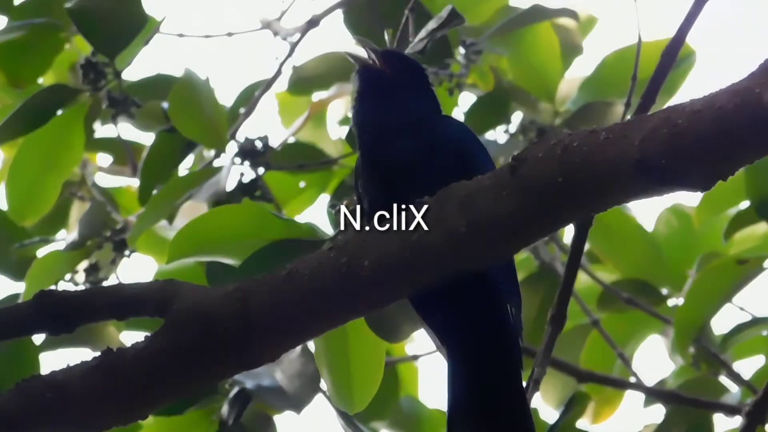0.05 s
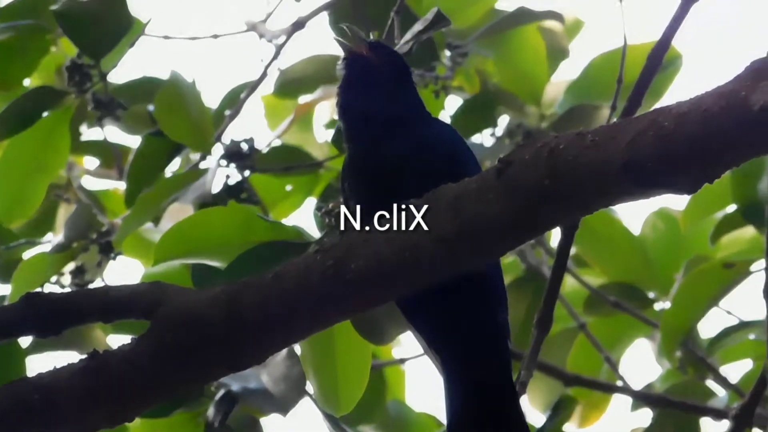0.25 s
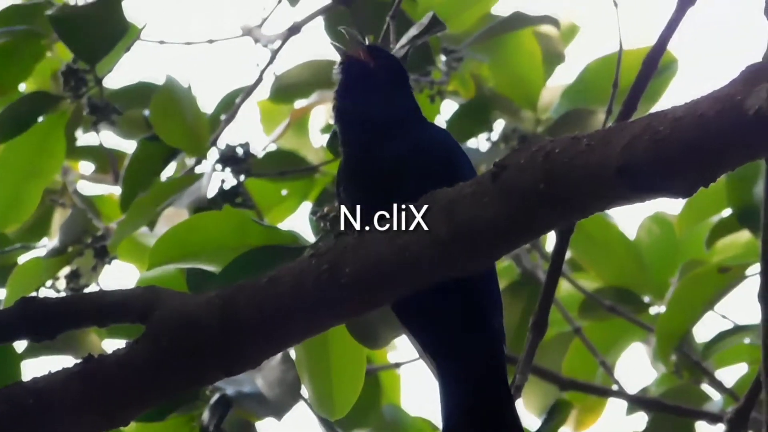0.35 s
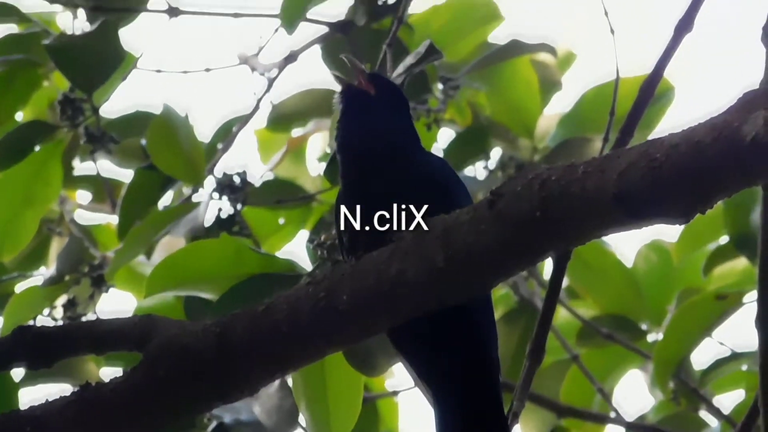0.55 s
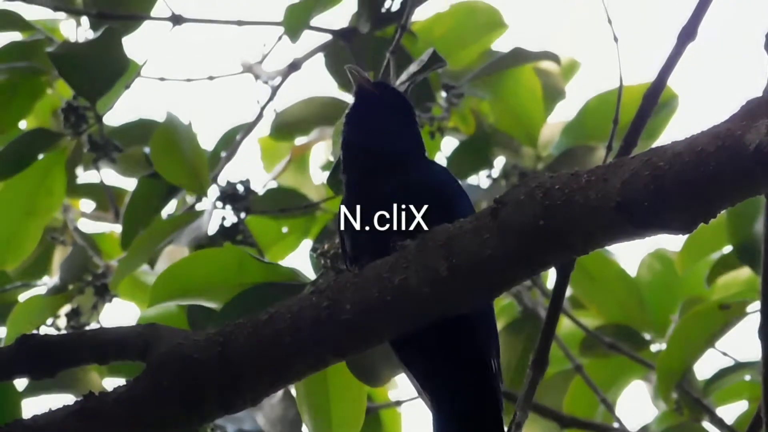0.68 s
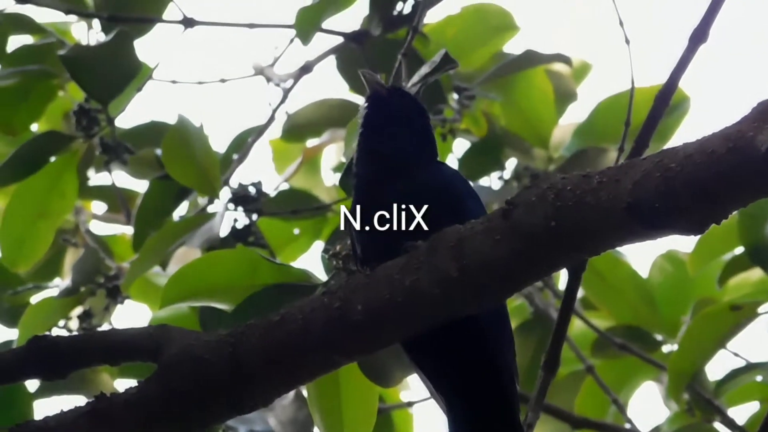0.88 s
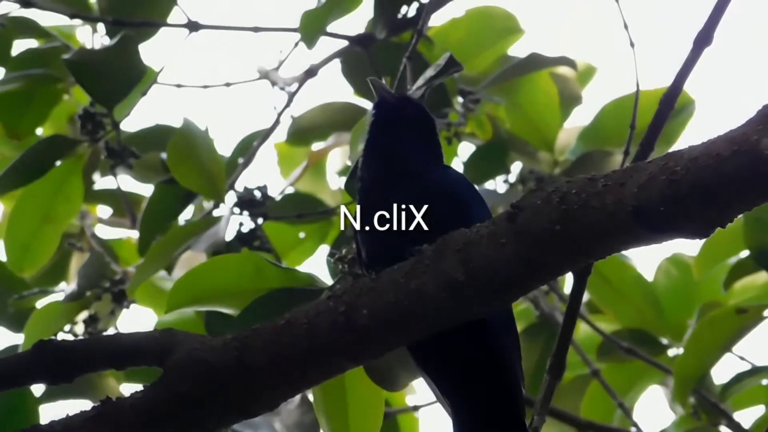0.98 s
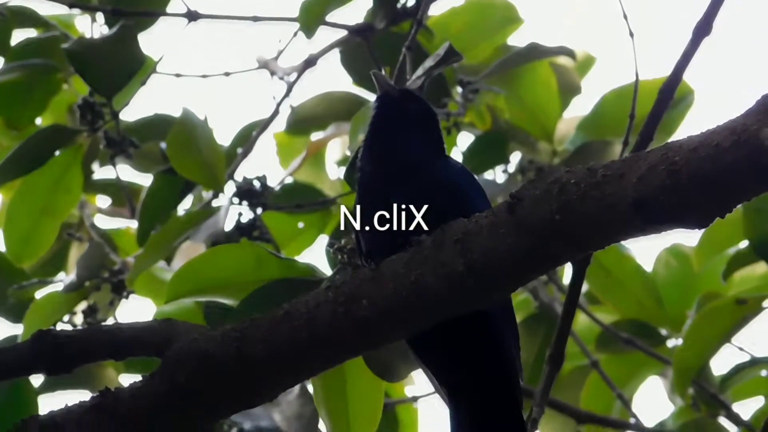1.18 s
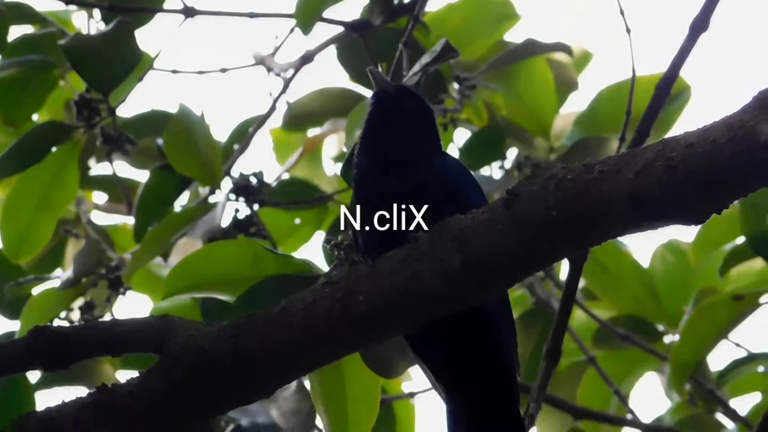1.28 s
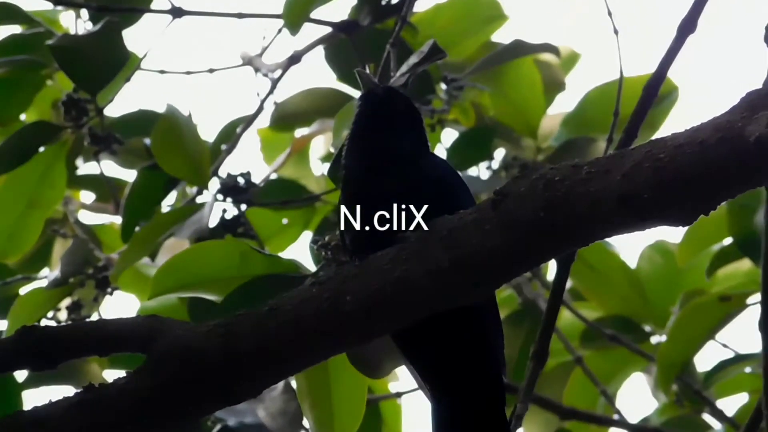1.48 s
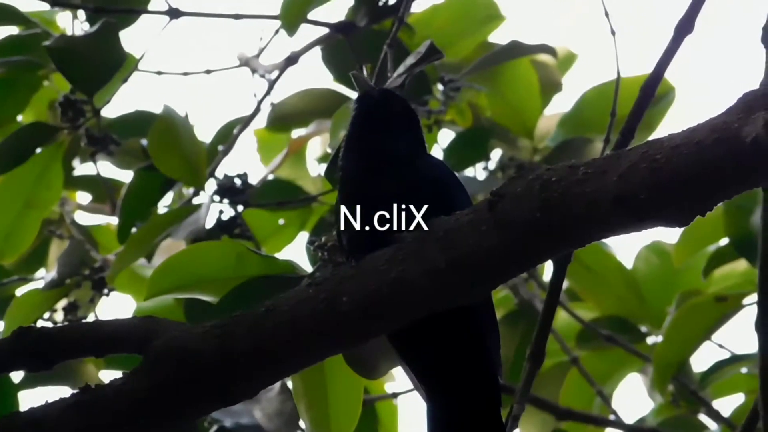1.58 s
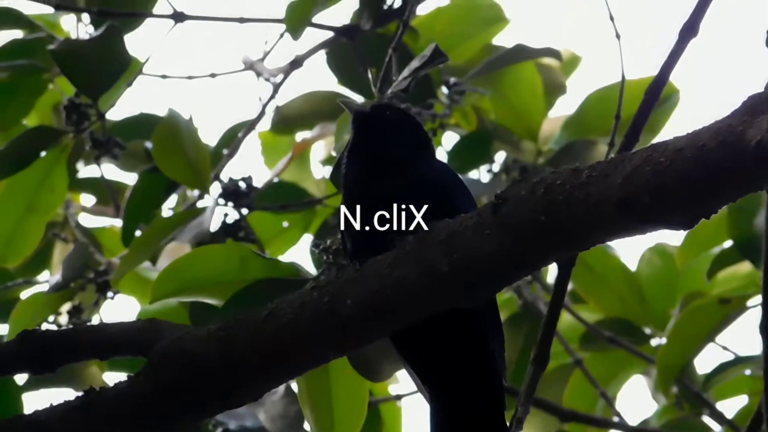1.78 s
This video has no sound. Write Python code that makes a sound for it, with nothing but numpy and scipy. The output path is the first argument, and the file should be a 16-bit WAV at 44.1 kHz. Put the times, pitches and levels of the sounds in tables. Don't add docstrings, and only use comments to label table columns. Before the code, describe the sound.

Single koel call early on, a breathy onset then a clear rising and falling whistle, heard outdoors from a small stereo microphone, followed by a short leafy reverberation, faint far pipings, hoarse crow chatter and low hum.

```python
import sys
import numpy as np
from scipy import signal
from scipy.fft import rfft, irfft, next_fast_len
from scipy.io import wavfile
from scipy.ndimage import uniform_filter1d, map_coordinates

SR = 44100
rng = np.random.default_rng(int(sys.argv[2]) if len(sys.argv) > 2 else 0)


def how_loud(loudness_db):
    steps = np.asarray(loudness_db, float) / 20
    return 10 ** steps


def store_wav(level_fs):
    pcm = np.round(np.clip(np.atleast_2d(level_fs), -1, 1) * 32767)
    wavfile.write(sys.argv[1], SR, pcm.T.astype(np.int16))


N = 81585
T = np.arange(N) / SR


def unit(x):
    return x / np.sqrt(np.mean(x ** 2) + 1e-20)


def along(points, hz):
    f, v = np.transpose(points)
    return np.interp(np.log(hz + 1), np.log(f + 1), v)


def smooth_curve(rows):
    s, v = np.transpose(rows)
    slope = np.gradient(v, s)
    k = np.clip(np.searchsorted(s, T) - 1, 0, len(s) - 2)
    h = s[k + 1] - s[k]
    u = np.clip((T - s[k]) / h, 0, 1)
    step = (v[k + 1] - v[k]) * u * u * (1 + 2 * (1 - u))
    bend = h * u * (1 - u) * ((1 - u) * slope[k] - u * slope[k + 1])
    return v[k] + step + bend


def wobble(rate):
    return map_coordinates(rng.standard_normal(200), [T * rate])


def filtered(x, response):
    m = next_fast_len(N + SR)
    return irfft(rfft(x, m) * response(np.fft.rfftfreq(m, 1 / SR)), m)[..., :N]


def coloured(x, colour):
    return filtered(x, lambda hz: how_loud(along(colour, hz)))


def placed(x, pan, lag_s):
    side = np.array([[.5], [-.5]])
    return filtered(x, lambda hz: how_loud(side * along(pan, hz)) * np.exp(-2j * np.pi * hz * side * lag_s))


def rush(spectrum, alike, patchy_db, wide, long):
    z = signal.stft(rng.standard_normal((2, N)), nperseg=512)[2]
    field = uniform_filter1d(rng.standard_normal(z.shape[1:]), wide, 0)
    field = uniform_filter1d(field, long, 1)
    pair = signal.istft(z * how_loud(patchy_db * unit(field)), nperseg=512)[1][:, :N]

    def mid_side(hz):
        turn = np.arccos(np.clip(along(alike, hz), -1, 1)) / 2
        return how_loud(along(spectrum, hz)) * [np.cos(turn), np.sin(turn)]

    mid, side = filtered(pair, mid_side)
    return unit(np.array([mid + side, mid - side]))


# (f/Hz, correlation)
ALIKE = [(40, .93), (80, .88), (140, .64), (300, .55), (640, .62), (1400, .4), (3000, 0), (15000, 0)]
# (f/Hz, level/dB per Hz)
TOWN = [(13, -38), (22, 1), (76, -0.5), (215, -8), (837, -4.5), (915, -3.5), (1170, -9), (1500, -9.5),
        (1950, -11), (3300, -120)]


def town():
    return how_loud(-55 + .4 * wobble(1)) * rush(TOWN, ALIKE, patchy_db=1.25, wide=6, long=14)


# (f/Hz, level/dB per Hz)
LEAVES = [(710, -33.5), (1200, -6), (1720, -11.5), (2020, -9.5), (6440, -24), (7240, -21), (15200, -28.5)]


def leaves():
    return how_loud(-56 + .13 * wobble(1.4)) * rush(LEAVES, ALIKE, patchy_db=-1.66, wide=6, long=14)


# (f/Hz, level/dB)
INSECTS = [(6300, -34), (6750, -10), (7100, 3), (7500, 0.5), (7800, -33)]


def insects():
    band = [(20, -120)] + INSECTS + [(12000, -120)]
    chorus = rush(band, [(7000, .1)], patchy_db=-6.5, wide=5, long=3)
    return how_loud(-70.5 + 1.8 * wobble(70.07)) * chorus


# (f/Hz, left over right level/dB)
TOWN_PAN = [(100, -2), (2000, -2), (12000, -1.5)]


def background():
    bed = filtered(town() + leaves(), lambda hz: how_loud([[.5], [-.5]] * along(TOWN_PAN, hz)))
    return bed + insects()


# (f/Hz, t60/s)
GARDEN = [(500, .8), (1400, .95), (3000, .6), (5500, .33), (10000, .4)]


def garden(x):
    _, t, z = signal_frames = signal.stft(rng.standard_normal((2, SR)), SR, nperseg=256)
    hz = signal_frames[0]
    decay = how_loud(-60 * t / along(GARDEN, hz)[:, None])
    a, b = signal.istft(z * decay, SR, nperseg=256)[1]
    u = np.arccos(.4) / 2
    tail = np.array([np.cos(u) * a + np.sin(u) * b, np.cos(u) * a - np.sin(u) * b])
    tail = tail * (1 - np.exp(-np.arange(len(a)) / SR / .02))
    tail = tail * how_loud(4 * wobble(40)[:len(a)])
    return signal.fftconvolve(x, tail / np.linalg.norm(tail[0]), axes=1)[:, :N]


# (t/s, level/dB)
CHATTER = [(0, -59), (.14, -60.5), (.3, -57.5), (1.02, -57.5), (1.13, -53.5), (1.3, -51.5), (1.42, -62),
           (1.52, -59.5), (1.85, -67)]
# (f/Hz, level/dB)
CROW = [(600, -58), (780, -4.5), (1000, -5.5), (1200, -1), (1400, -17.5), (1800, -19)]


def far_crows():
    band = [(20, -120)] + CROW + [(4000, -120)]
    voices = rush(band, [(1000, .75)], patchy_db=5, wide=1, long=5)
    lumps = how_loud(np.interp(T, *np.transpose(CHATTER)) + 2.5 * wobble(25))
    return lumps * voices * how_loud([[-1.2], [1.2]])


def whistles(rows):
    out = np.zeros(N)
    for start, length, hz, end_hz, db in rows:
        u = np.clip((T - start) / length, 0, 1)
        turn = 2 * np.pi * np.cumsum(hz + (end_hz - hz) * u) / SR
        out += how_loud(db) * np.sin(np.pi * u) ** .45 * np.sin(turn)
    return out * how_loud(2.1 * wobble(44.83)) * np.sqrt(2)


# (t/s, length/s, start f/Hz, end f/Hz, level/dB)
AHEAD = [(0, .07, 3660, 3640, -68), (.42, .06, 1740, 1735, -63), (.43, .06, 2090, 2085, -66),
         (.895, .1, 872, 866, -58), (.9, .07, 3700, 3650, -67), (1.205, .04, 1920, 1915, -62),
         (1.772, .028, 1250, 950, -53), (1.44, .08, 510, 500, -59), (.86, .06, 520, 500, -60),
         (1.8, .05, 1800, 1790, -65)]
# (t/s, length/s, start f/Hz, end f/Hz, level/dB)
ASIDE = [(1.525, .215, 1640, 1515, -54.5), (1.48, .2, 3385, 3375, -67), (1.728, .016, 4800, 4200, -66),
         (1.766, .022, 4900, 3950, -65), (1.806, .022, 4900, 4000, -63), (1.025, .01, 3900, 3000, -64)]


def far_birds():
    ahead = placed(whistles(AHEAD), [(1000, -3)], 0)
    aside = placed(whistles(ASIDE), [(1000, -4)], .00017)
    notes = ahead + aside
    return notes + how_loud(-8) * garden(notes) + far_crows()


# (delay t/s, left level/dB, right level/dB)
ECHOES = [(.0089, -6.5, -6.5), (.024, -17, -17), (.036, -16, -16), (.07, -19, -19), (.11, -21, -21),
          (.185, -23, -23), (.275, -28, -28)]


def echoes(call):
    def response(hz):
        dull = 1 / (1 + 1j * hz / 25000)
        return sum(how_loud([[left_db], [right_db]]) * np.exp(-2j * np.pi * hz * s) * dull
                   for s, left_db, right_db in ECHOES)
    return filtered(call, response)


# (f/Hz, level/dB)
LEAF_SCATTER = [(2000, 0), (6000, 6), (10000, 16), (13000, 12)]


def leaf_scatter(call):
    return how_loud(-18.5) * garden(coloured(call, LEAF_SCATTER))


# (f/Hz, level/dB)
PUFF = [(600, -38), (800, -12), (1900, 5), (2600, -11), (4000, -11.5), (9000, -37), (10800, -20),
        (13000, -39)]


def puff():
    swell = np.exp(-((T - .167) / .0089) ** 2)
    return how_loud(-51) * swell * unit(coloured(rng.standard_normal(N), PUFF))


# (f/Hz, level/dB)
BEAK = [(1500, -37), (2500, 9), (4500, 2.5), (6500, -16), (9000, 6.5), (15000, -14)]


def breath():
    response = lambda hz: how_loud(along(BEAK, hz)) * (hz > 1300)
    return how_loud(-38) * unit(filtered(rng.standard_normal(N), response))


# (level/dB re fundamental on the low note, same at the top of the rise)
OVERTONES = [(-29, -29), (-46, -37), (-45, -25), (-22, -25), (-39, -52), (-41, -33), (-38, -36), (-34, -35),
             (-42, -52), (-38, -54), (-47, -58)]
STRAIN_DB = [20, 0, 0, 0, 6, 6, 20, 12, 8, 4, 12]


def overtones(turn, pitch, falling, croak):
    jitter = unit(uniform_filter1d(rng.standard_normal(N), size=300))
    shake = (.03 + .07 * falling) * jitter
    low_hz, top_hz = 1235, 1350
    open_beak = np.clip((pitch - low_hz) / (top_hz - low_hz), 0, 1)
    out = np.zeros(N)
    for k, ((low_db, top_db), strain_db) in enumerate(zip(OVERTONES, STRAIN_DB), 2):
        db = low_db + (top_db - low_db) * open_beak + strain_db * croak
        db = db - .22 * k * falling + 3 * wobble(24)
        out += how_loud(db) * np.sin(k * (turn + shake) + k * k)
    return out


# (t/s, f/Hz)
PITCH = [(.16, 1206), (.30, 1233), (.38, 1215), (.46, 1266), (.54, 1370), (.60, 1453), (.65, 1367),
         (.70, 1206), (.785, 799)]
# (t/s, level/dB)
EFFORT = [(.152, -75), (.175, -46.5), (.2, -38), (.25, -35.5), (.42, -33), (.55, -28), (.63, -26),
          (.73, -37), (.785, -55)]


def koel():
    pitch = smooth_curve(PITCH)
    effort_db = np.interp(T, *np.transpose(EFFORT), left=-130, right=-130)
    effort_db = uniform_filter1d(effort_db, size=301)
    falling = np.maximum(-np.gradient(pitch) * SR / 1000, 0)
    pitch = pitch * (1 - .3 * np.exp(-np.maximum(T - .158, 0) / .005))
    turn = 2 * np.pi * np.cumsum(pitch) / SR
    croak = np.exp(-(np.maximum(T - .18, 0) / .019) ** 2)
    whistle = np.sin(turn) * (1 + .46 * croak * np.sin(.29 * turn))
    voice = whistle + overtones(turn, pitch, falling, croak) + breath()
    return how_loud(effort_db) * np.sqrt(2) * voice + puff()


# (f/Hz, left over right level/dB)
HEAD_SHADE = [(1000, -2), (2500, -8.5), (6000, -6), (12000, -6.5)]


def scene():
    call = placed(koel(), HEAD_SHADE, -.000021)
    return call + echoes(call) + leaf_scatter(call) + far_birds() + background()


def roll_off(x):
    return signal.sosfilt(signal.butter(12, 15400, fs=SR, output="sos"), x)


def record(dry):
    return roll_off(dry)


dry = scene()
out = record(dry)
store_wav(out)
```